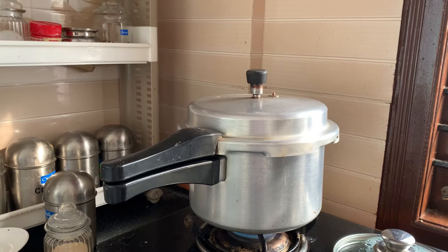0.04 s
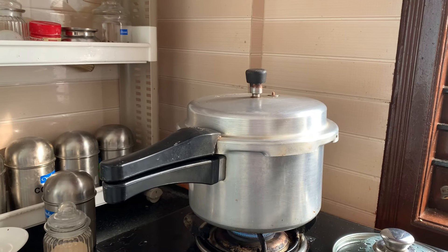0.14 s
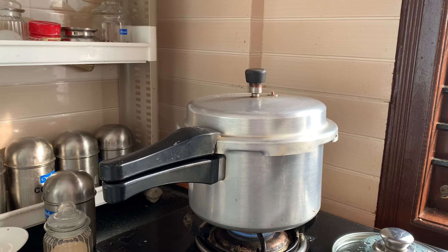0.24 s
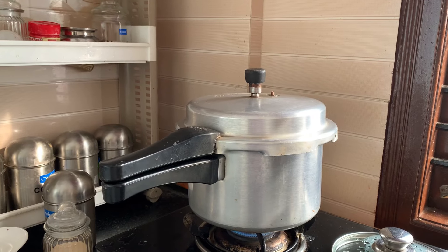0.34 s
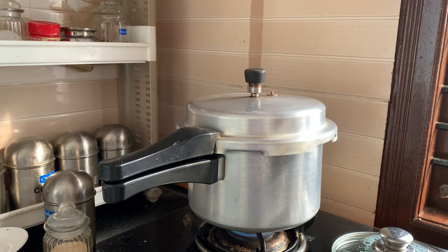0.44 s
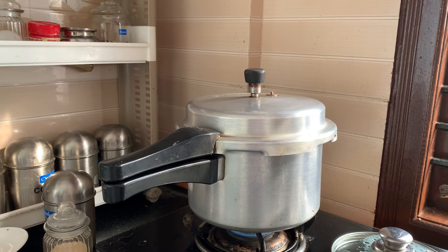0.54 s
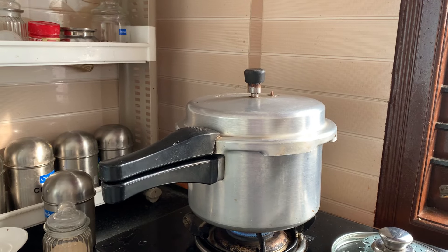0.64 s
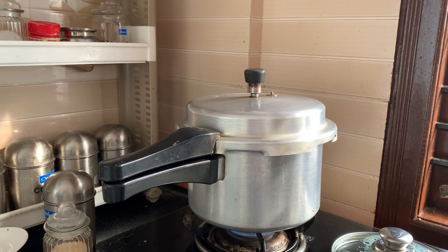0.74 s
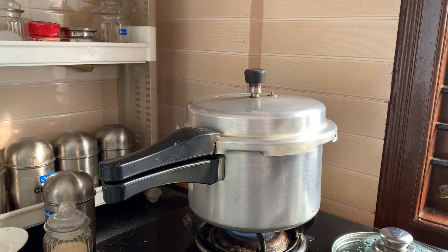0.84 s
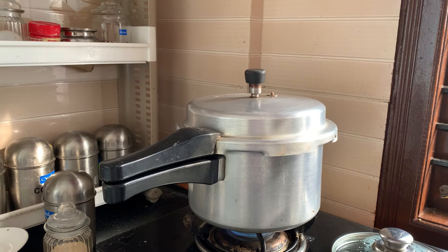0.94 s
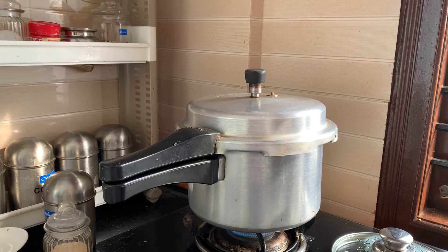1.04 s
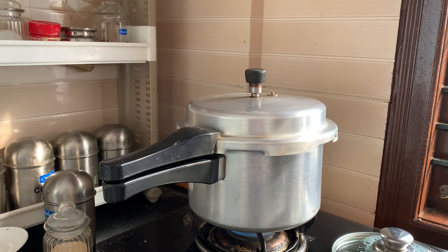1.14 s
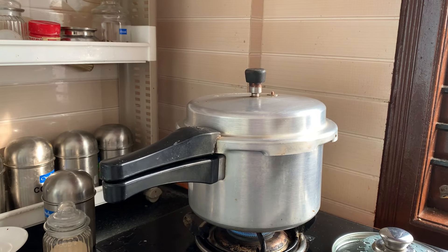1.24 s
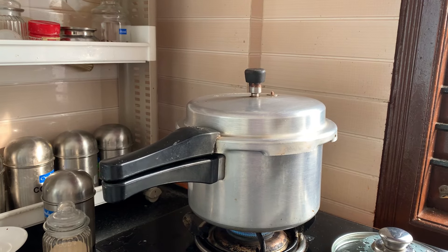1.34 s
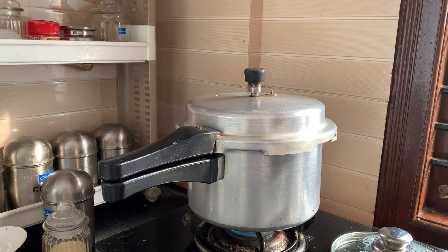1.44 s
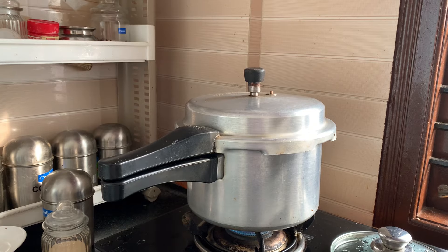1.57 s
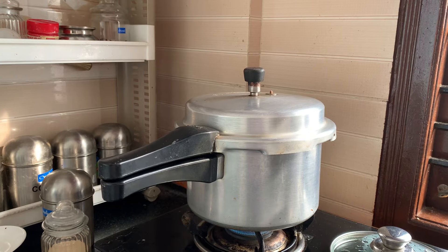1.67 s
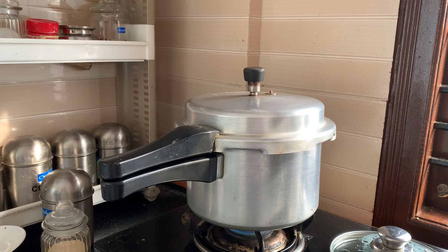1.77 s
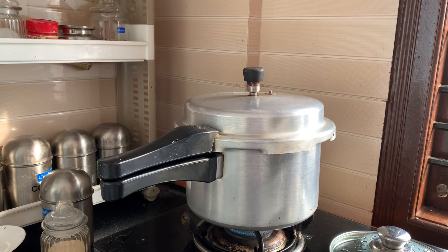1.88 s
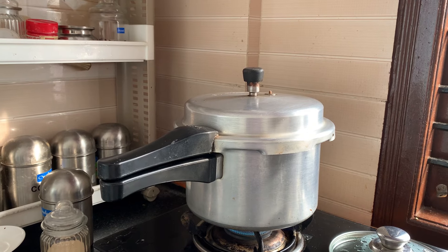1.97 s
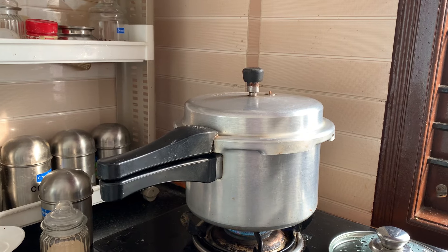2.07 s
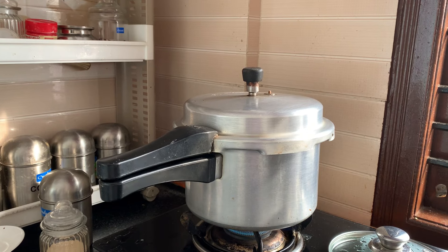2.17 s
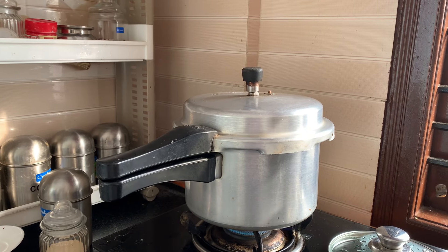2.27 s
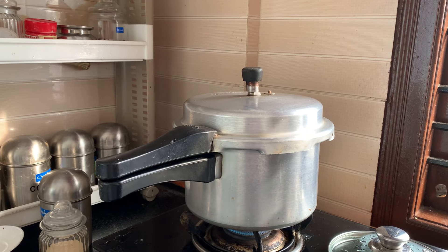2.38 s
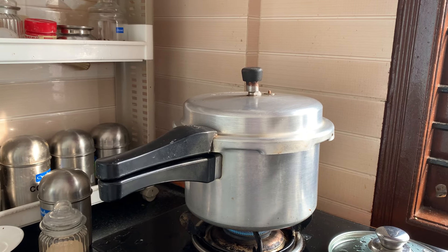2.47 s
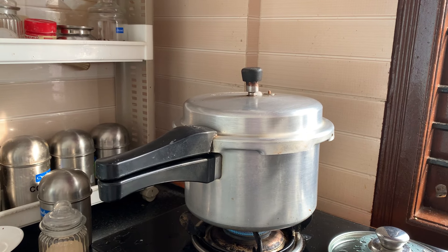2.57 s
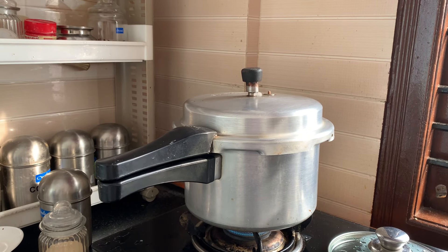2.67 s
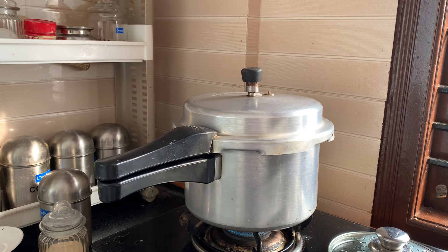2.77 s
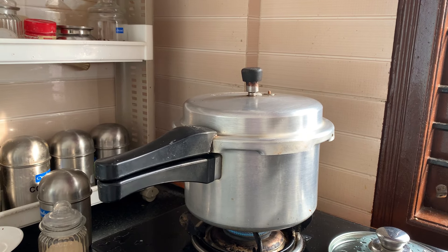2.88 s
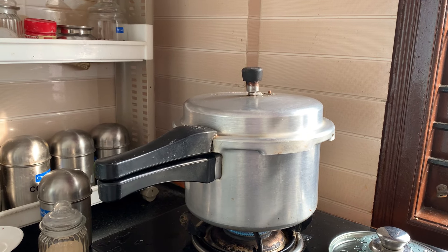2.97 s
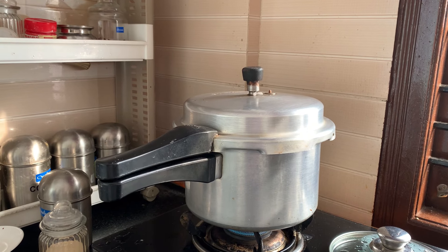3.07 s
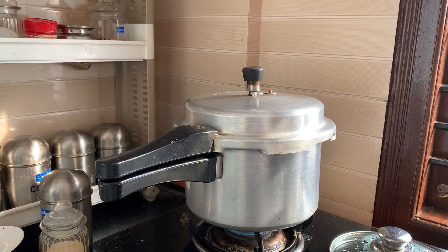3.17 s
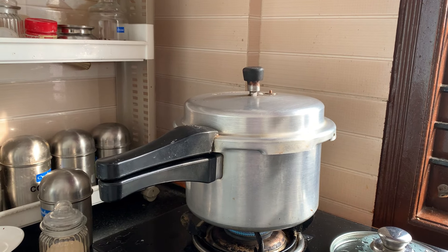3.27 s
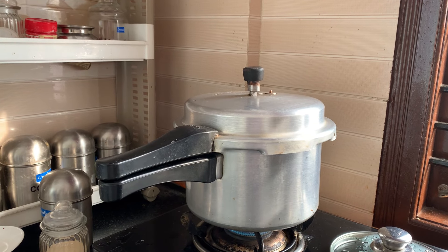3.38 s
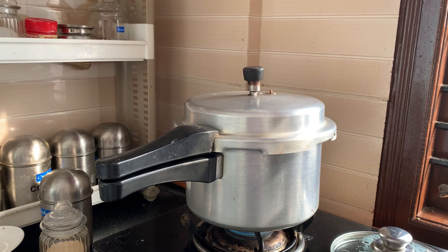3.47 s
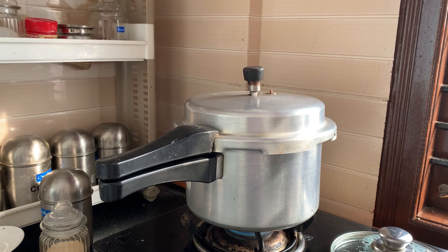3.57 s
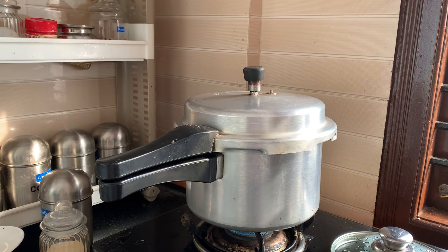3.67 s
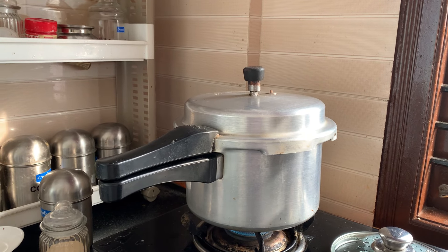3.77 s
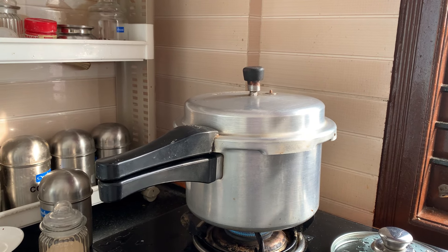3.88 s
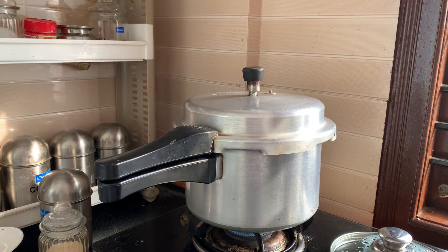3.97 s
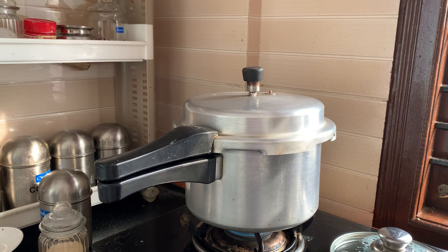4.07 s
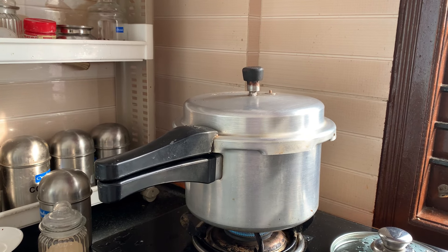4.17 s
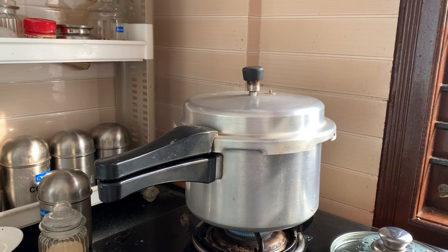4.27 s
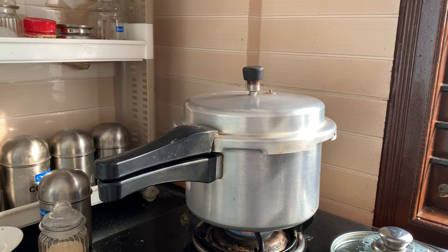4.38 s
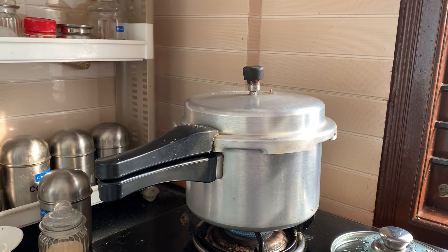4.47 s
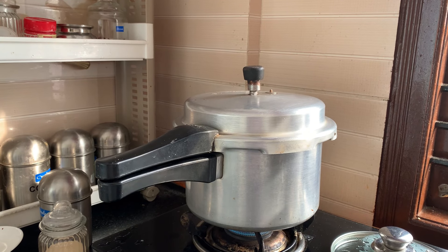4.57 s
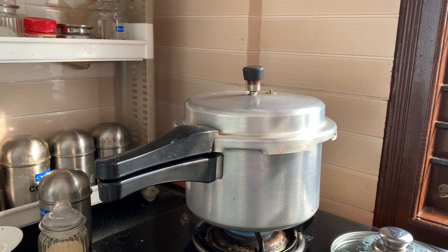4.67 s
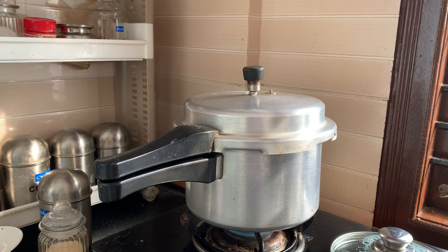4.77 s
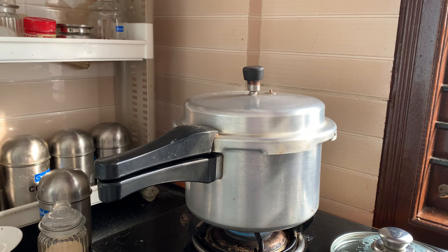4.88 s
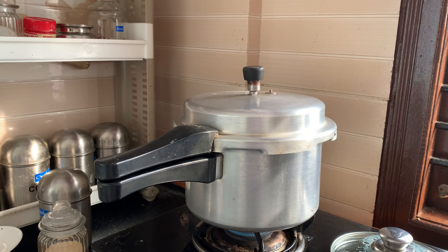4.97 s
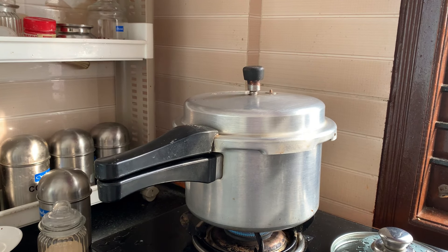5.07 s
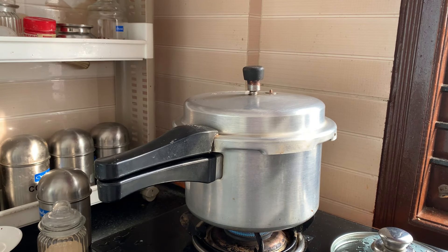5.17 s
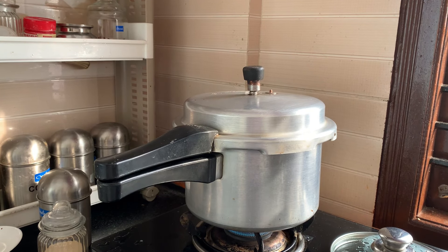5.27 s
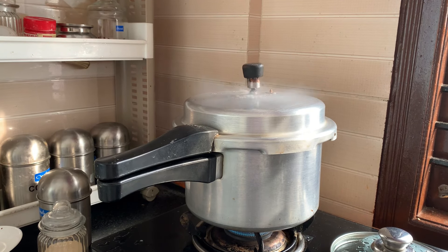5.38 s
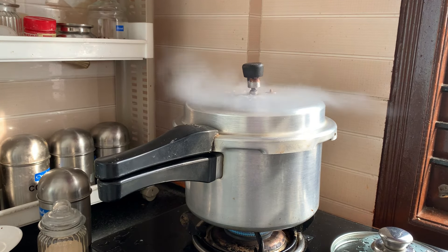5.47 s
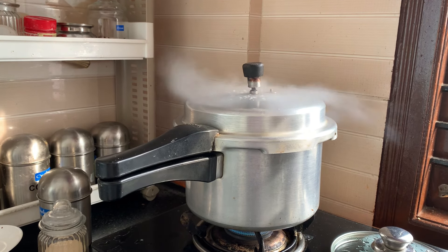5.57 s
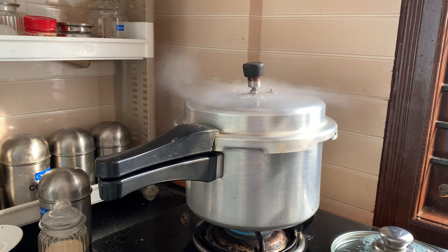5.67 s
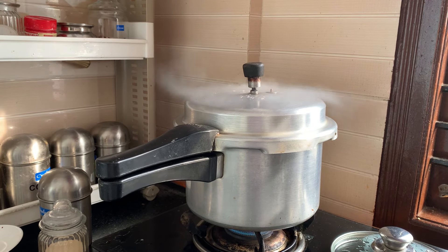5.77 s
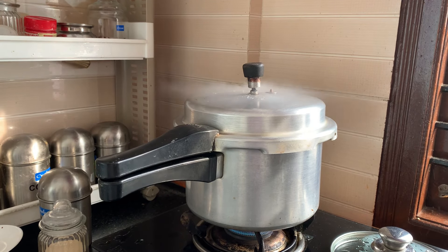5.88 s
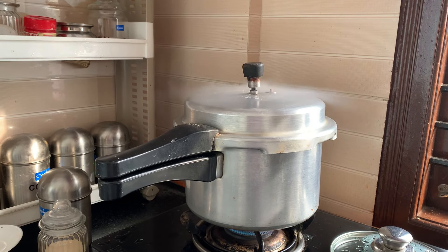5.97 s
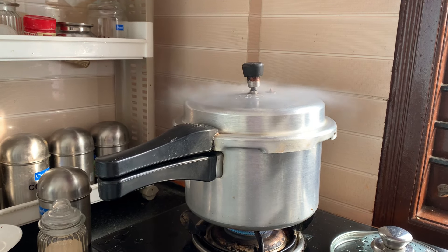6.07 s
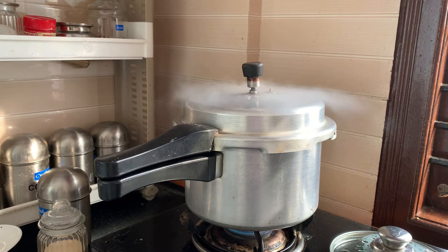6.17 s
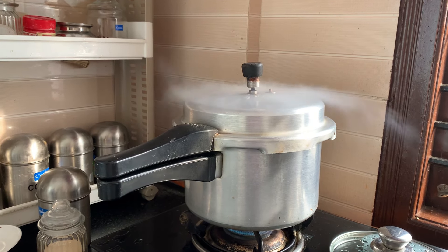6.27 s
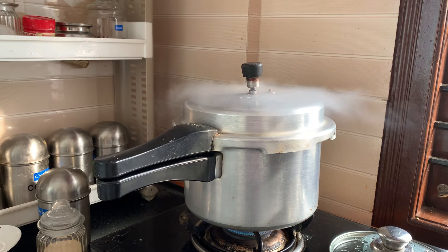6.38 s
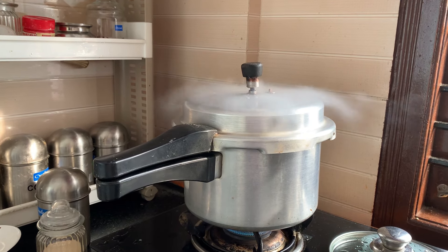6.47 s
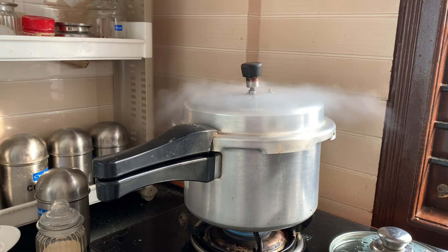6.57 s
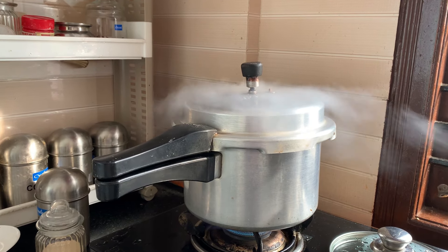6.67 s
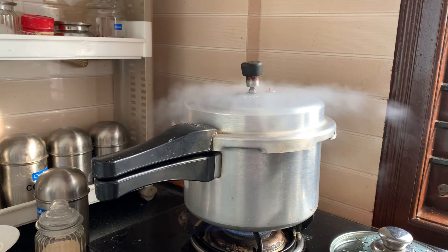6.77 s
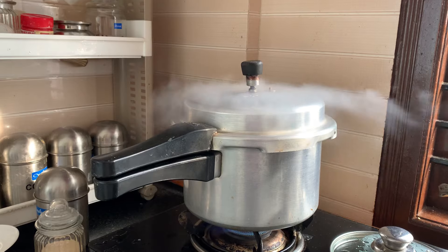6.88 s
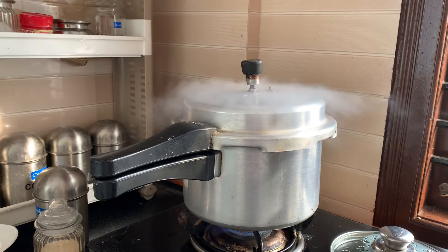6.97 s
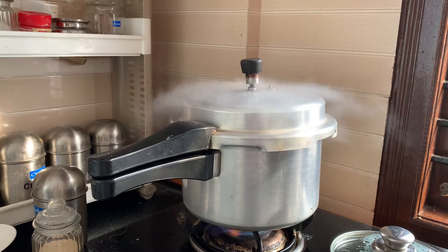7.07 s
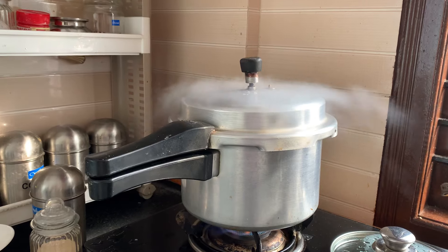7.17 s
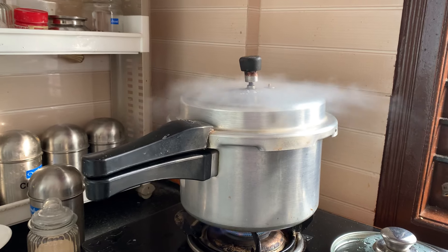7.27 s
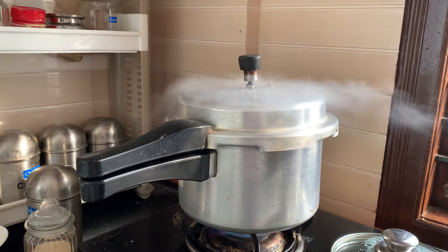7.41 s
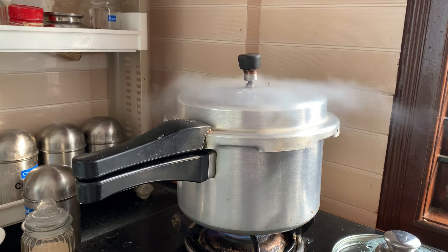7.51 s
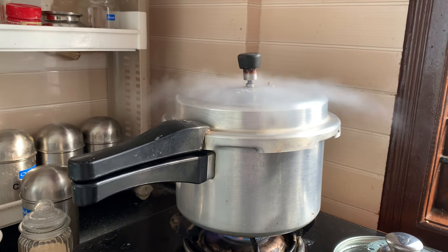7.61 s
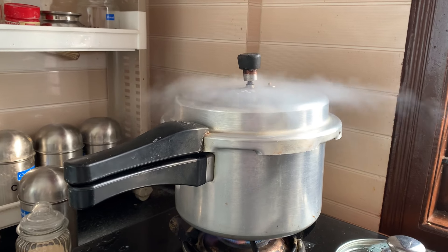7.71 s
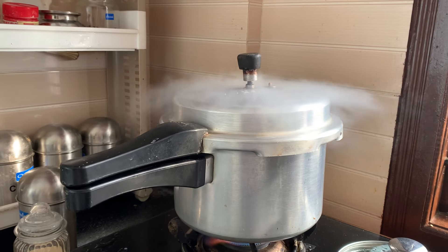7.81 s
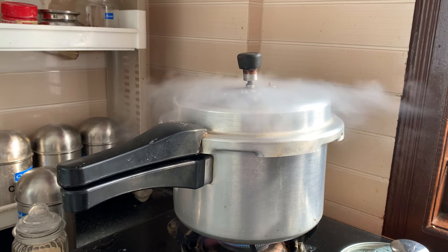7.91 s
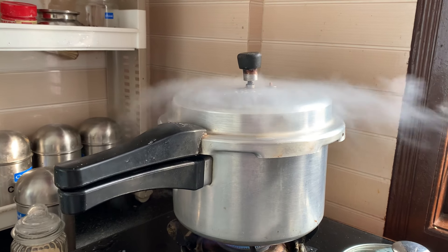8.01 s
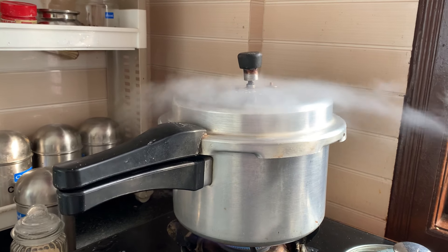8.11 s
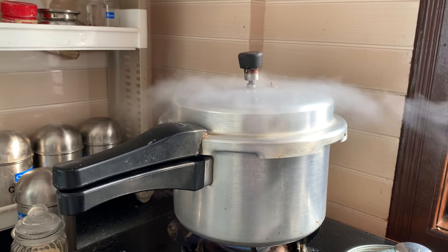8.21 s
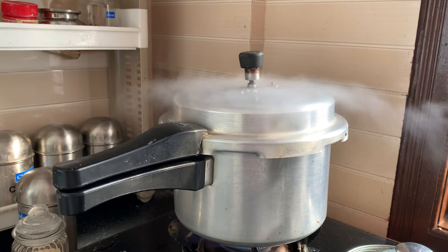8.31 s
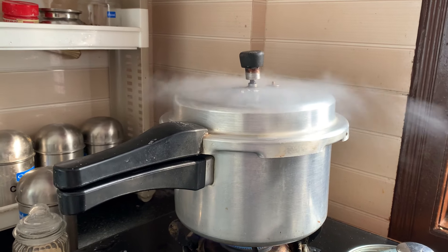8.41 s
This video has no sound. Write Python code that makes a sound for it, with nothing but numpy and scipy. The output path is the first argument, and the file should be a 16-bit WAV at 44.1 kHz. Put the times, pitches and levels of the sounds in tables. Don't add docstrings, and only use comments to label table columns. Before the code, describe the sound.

A stovetop cooker heard near its valve: low burner rumble, distant hum and delicate airy hiss, with one faint tap. The weight then clicks and the hiss becomes brighter and stronger, holding steady. Quick hard ticks release a sudden loud blast of steam with a brief wet roar; it drops a little and continues to the end. Short tiled-room reflections, wide stereo, automatic gain pushing the background down.

```python
import sys
import numpy as np
from scipy import signal
from scipy.fft import rfft, irfft, next_fast_len
from scipy.io import wavfile
from scipy.ndimage import uniform_filter1d

SR = 44100
rng = np.random.default_rng(int(sys.argv[2]) if len(sys.argv) > 2 else 0)


def wav_record(signal):
    frames = np.transpose(np.atleast_2d(signal))
    bounded = np.clip(frames, -1, 1)
    quanta = np.round(bounded * 32767).astype(np.int16)
    wavfile.write(sys.argv[1], SR, quanta)


def attenuation_scalar(level_db):
    decades = np.asarray(level_db, float) / 20
    return 10 ** decades


N = 372556
STEP = 20
SIZE = next_fast_len(N + SR // 2)
HZ = np.arange(1, SIZE // 2 + 2) * SR / SIZE

# [multiple of shaft rate, level/dB rms]
MOTOR_HARMONICS = [(6, -67), (7, -61.5), (9, -79), (10, -86), (11, -77.5), (12, -73.5), (14, -77),
                   (15, -76), (17, -70), (26, -75), (27, -75.5)]
MOTOR_HZ = 47.74
# [f/Hz, level/dB per Hz]
FLAME_SPECTRUM = [(13, -48), (22, -35), (65, 7.5), (141, -18.5), (193, 0), (303, -4), (331, -8),
                  (367, -7.5), (687, -13.5), (762, -10), (817, -15), (861, -18), (1400, -18.5), (1820, -52),
                  (3080, -120)]
FLAME_DB = -52.5
# [t/s, level/dB, width/s]
FLAME_PUFFS = [
    (1.33, 1, 0.037),
    (1.62, 5, 0.018),
    (4.39, 0, 0.026),
    (4.71, 7.5, 0.078),
]
# [f/Hz, width/Hz, level/dB rms]
FLUE_TONES = [(71, 18, -57), (201, 15, -60.5)]

# [f/Hz, level/dB per Hz]
ROAR_SPECTRUM = [(150, -20.5), (300, -10.5), (600, -8), (1000, 1.5), (1400, 0), (1900, -3)]
SIMMER_DB = -61.5
ROAR_TIPPED_DB, ROAR_OPEN_DB = -27, -32.5
BURST_S, BURST_ATTACK_S, BURST_HOLD_S, BURST_RELEASE_S, BURST_DB = 5.345, 0.02, .06, 0.05, 13

# [t/s, peak level/dB]
KNOCKS = [
    (1.055, -28),
    (1.0592, -28),
    (2.5565, -7),
    (2.558, -11.5),
    (5.3974, -12),
    (5.404, -2),
    (5.4134, -14),
]
# [f/Hz, level/dB, t60/s]
WEIGHT_MODES = [(2910, 4, 0.0088), (6450, -36.5, 0.036), (7350, 2, 0.045), (11200, -12, 0.026),
                (13200, -56, .008)]
# [t/s, level/dB]
STEAM_LEVEL = [(0, -44.5), (1.3, -42.5), (2.03, -42), (2.28, -36.5), (2.4, -35), (2.553, -24),
               (2.559, -23.5), (3.6, -23), (4.2, -21.5), (5.24, -22), (5.335, -20), (5.36, -10),
               (5.44, -10.5), (5.49, -13), (5.95, -13.5), (6.03, -17.5), (8.08, -19.5), (8.45, -20.5)]
# [t/s, level/dB, fading time/s]
STEAM_SWINGS = [
    (1.055, 4, 0.016),
    (2.556, -2, 0.024),
]
# [t/s, lift (0 seated, 1 tipped, 2 open), spitting/dB]
VALVE = [
    (0, 0.053, 1.5),
    (2.05, 0.19, 0),
    (2.45, 0.62, 1.5),
    (2.6, 0.74, -0.5),
    (5.25, 0.95, -0.3),
    (5.36, 1.46, 0.5),
    (5.4, 2, 2.5),
    (5.6, 3.16, 0.5),
    (8.45, 1.56, 1),
]
# [f/Hz, level/dB per Hz]
JET_SEATED = [(1200, -11.5), (2000, -6.5), (4000, -5.5), (5000, -6), (6500, 1), (7500, -4), (10000, -1.5),
              (11500, -4), (13200, -6), (14500, -8), (15500, -19)]
JET_TIPPED = [(1200, -25), (2000, -14), (3000, -10), (5000, -6), (6200, -1.5), (7500, -6), (9000, 4),
              (10500, 2), (11500, -2.5), (13200, 5), (14500, -4.5), (15600, -20)]
JET_OPEN = [(1200, -20.5), (2000, -11.5), (3000, -6.5), (5000, -3.5), (7500, -2), (8500, 2), (10000, 0),
            (13000, -1), (15600, -6)]

# [f/Hz, width/Hz, level/dB]
PEAKS_AND_DIPS = [(447, 125, 4), (3008, 82, 6.5), (2657, 76, -7.5), (3313, 104, -8.5), (3800, 67, 3), (3983, 46, 4.5),
                  (4860, 27, -2.5), (5070, 245, -3.5), (5870, 36, 0), (6310, 50, 7.5), (7230, 240, -3), (8420, 540, 4)]
KITCHEN_T60_S, KITCHEN_DB = .15, -.5
# [f/Hz, likeness 0-1]
LIKENESS = [(60, 0.46), (130, 0.91), (290, 0.77), (640, 0.051), (1400, 0.18), (16000, 0.007)]
LEFT_LEAD, DIRECT_SHARE = 13.22, 0.2
PORT_LAG, PORT_FROM_HZ = 14.94, 8370
INVERTED_FROM_HZ, TOP_TURN = 14760, .55
# [f/Hz, level/dB]
LEFT_OVER_RIGHT = [(60, 3), (300, -6.5), (600, -1.5), (1300, 1.5), (2400, 1), (4500, -1.5), (6200, -3),
                   (8500, -4), (10300, -0.5), (16000, 0.5)]
TOP_HZ = 15720
GAIN_DB = 2.5
# [t/s, level/dB, time constant/s]
GAIN_DROPS = [
    (5.37, -17.5, 0.063),
    (5.97, -3, .03),
]


def rms_one(x):
    return x / np.sqrt(np.mean(x ** 2) + 1e-20)


def in_time(rows):
    s, *columns = np.transpose(rows)
    return [np.interp(np.arange(N) / SR, s, c) for c in columns]


def at_hz(points, hz):
    f, value = np.transpose(points)
    return np.interp(np.log(hz), np.log(f), value)


def sparse_drift(rate):
    r = np.exp(-2 * np.pi * rate * STEP / SR)
    noise = rng.standard_normal(N // STEP + 4002)
    slow = signal.lfilter([1], [1, -2 * r, r * r], noise)[4000:]
    return rms_one(slow - slow.mean())


def fill_in(sparse):
    return np.interp(np.arange(N) / STEP, np.arange(len(sparse)), sparse)


def drift(rate):
    return fill_in(sparse_drift(rate))


def spread(mid, side):
    alike = at_hz(LIKENESS, HZ)
    return np.sqrt(1 + alike) * mid + np.sqrt(1 - alike) * side * [[1], [-1]]


def coloured(spectrum, channels=1):
    inside = (HZ > spectrum[0][0]) * (HZ < spectrum[-1][0])
    shape = attenuation_scalar(at_hz(spectrum, HZ)) * inside
    if channels == 1:
        return rms_one(irfft(rfft(rng.standard_normal(SIZE)) * shape, SIZE)[:N])
    mid, side = rfft(rng.standard_normal((2, SIZE))) * shape
    return rms_one(irfft(spread(mid, side), SIZE)[:, :N])


def resonate(x, hz, width_hz):
    r = np.exp(-np.pi * width_hz / SR)
    return signal.lfilter([1, 0, -1], [1, -2 * r * np.cos(2 * np.pi * hz / SR), r * r], x)


def motor():
    turn = 2 * np.pi * MOTOR_HZ * np.arange(N) / SR
    out = 0
    for order, db in MOTOR_HARMONICS:
        start = rng.uniform(0, 2 * np.pi) + rng.normal(0, .5, (2, 1))
        level = np.sqrt(2) * attenuation_scalar(db + 2.15 * drift(2.6))
        out = out + level * np.sin(round(order) * turn + start)
    return out


def flame():
    s = np.arange(N) / SR
    puffs_db = sum(db * np.exp(-((s - at) / width) ** 2) for at, db, width in FLAME_PUFFS)
    out = attenuation_scalar(FLAME_DB - 7.0) * coloured(FLAME_SPECTRUM, channels=2)
    for hz, width_hz, db in FLUE_TONES:
        out = out + attenuation_scalar(db) * rms_one(resonate(rng.standard_normal(N), hz, width_hz))
    return out * attenuation_scalar(1.0 * drift(5.4) + puffs_db)


def roar(steam_db, lift, spit_db):
    corners = BURST_S + np.cumsum([0, BURST_ATTACK_S, BURST_HOLD_S, BURST_RELEASE_S])
    burst_db = BURST_DB * np.interp(np.arange(N) / SR, corners, [0, 1, 1, 0])
    riding_db = steam_db + np.interp(lift, [1, 2], [ROAR_TIPPED_DB, ROAR_OPEN_DB]) + burst_db
    level = np.hypot(attenuation_scalar(SIMMER_DB), attenuation_scalar(riding_db)) * attenuation_scalar(spit_db * drift(60))
    return level * np.array([coloured(ROAR_SPECTRUM), coloured(ROAR_SPECTRUM)])


def ticks():
    knock_s, knock_db = np.transpose(KNOCKS)
    at = [round(s * SR) for s in knock_s]
    ring = np.zeros(N)
    for hz, level_db, t60 in WEIGHT_MODES:
        clicks = np.full(N, 1e-18)
        clicks[at] = attenuation_scalar(knock_db + level_db - 24 + rng.normal(0, 2, len(at)))
        ring += resonate(clicks, hz, np.log(1000) / (np.pi * t60))
    clicks = np.full(N, 1e-18)
    clicks[at] = attenuation_scalar(knock_db + 4.0)
    fading = signal.lfilter([1], [1, -np.exp(-1 / (.0012 * SR))], clicks)
    crack = fading * rng.standard_normal(N)
    lowpass = signal.butter(6, 12000, fs=SR, output="sos")
    return signal.sosfilt(lowpass, ring + np.diff(crack, prepend=0) / 2)


def steam_level():
    s = np.arange(N) / SR
    level_db = in_time(STEAM_LEVEL)[0]
    for at, db, fade in STEAM_SWINGS:
        level_db = level_db + db * (s > at) * np.exp(-np.maximum(s - at, 0) / fade)
    return level_db


def jet(lift, spit_db):
    edges = 1200 * 2 ** np.arange(0, 3.9, .2)
    centres = np.sqrt(edges[1:] * edges[:-1])
    lift = np.pad(lift[::STEP], (0, 1), "edge")
    colours_db = np.transpose([at_hz(colour, centres) for colour in (JET_SEATED, JET_TIPPED, JET_OPEN)])
    gains = attenuation_scalar([np.interp(lift, [0, 1, 2], db) for db in colours_db])
    gains /= np.sqrt(np.sum(gains ** 2 * np.diff(edges)[:, None] * 2 / SR, axis=0))
    white = rng.standard_normal((2, 2, N))
    out = 0
    for k, (low, high) in enumerate(zip(edges, edges[1:])):
        bandpass = signal.butter(2, [low, high], "band", fs=SR, output="sos")
        band = signal.sosfilt(bandpass, white[k % 2])
        out = out + fill_in(gains[k] * attenuation_scalar(0.42 * sparse_drift(9.7))) * band
    return out * attenuation_scalar(spit_db * drift(110) + 0.14 * drift(22))


def kitchen(holes):
    s = np.arange(SR // 2) / SR
    echoes = rng.standard_normal((3, 2, len(s))) * attenuation_scalar(-60 * s / KITCHEN_T60_S)
    echoes *= attenuation_scalar(KITCHEN_DB) / np.sqrt(np.sum(echoes ** 2, axis=2, keepdims=True))
    echoes[0, 0, 0] += 1
    echoes[1, 1, 0] += 1
    echoes[2] *= attenuation_scalar(-7.0)
    echoes[2, 0, 0] += 1
    paths = rfft(echoes, SIZE)
    power = np.sum(abs(paths) ** 2, axis=1, keepdims=True)
    paths /= np.sqrt(uniform_filter1d(power, size=SIZE // 120))
    peaks_db = sum(db * np.exp(-((HZ - hz) / width_hz) ** 2) for hz, width_hz, db in PEAKS_AND_DIPS)
    mid, side, port = np.sum(paths * rfft(holes, SIZE), axis=1) * attenuation_scalar(peaks_db)

    diffuse = spread(mid, side) / np.sqrt(2)
    late = np.exp(-2j * np.pi * HZ * .0015)
    direct = np.array([np.ones_like(HZ), np.exp(-2j * np.pi * HZ * LEFT_LEAD / SR)]) * port
    below = np.sqrt(1 - DIRECT_SHARE) * late * diffuse + np.sqrt(DIRECT_SHARE) * direct

    turn = np.minimum(HZ, INVERTED_FROM_HZ + TOP_TURN * (HZ - INVERTED_FROM_HZ)) * PORT_LAG / SR
    paired = np.array([-np.exp(-2j * np.pi * turn), np.ones_like(HZ)]) * port
    share = 1 / (1 + (PORT_FROM_HZ / HZ) ** 16)
    return irfft(np.sqrt(1 - share) * below + np.sqrt(share) * paired, SIZE)[:, :N]


def recorder_gain():
    s = np.arange(N) / SR
    drops_db = sum(db * (1 - np.exp(-np.maximum(s - at, 0) / lag)) for at, db, lag in GAIN_DROPS)
    return attenuation_scalar(GAIN_DB + drops_db)


def scene():
    steam_db = steam_level()
    lift, spit_db = in_time(VALVE)
    low = roar(steam_db, lift, spit_db)
    hiss = attenuation_scalar(steam_db) * jet(lift, spit_db)
    steam = attenuation_scalar(-4.0) * (hiss + low) + ticks() * [[1], [.4]]
    return kitchen(steam / recorder_gain()) + flame() + motor()


def low_pass(x):
    return signal.sosfilt(signal.butter(12, 15810, fs=SR, output="sos"), x)


def record(dry):
    side_db = at_hz(LEFT_OVER_RIGHT, HZ) / 2 * np.array([[1], [-1]])
    tilt = attenuation_scalar(side_db) * (HZ < TOP_HZ)
    heard = irfft(rfft(dry * recorder_gain(), SIZE) * tilt, SIZE)[:, :N]
    return low_pass(heard)


dry = scene()
out = record(dry)
wav_record(out)
```